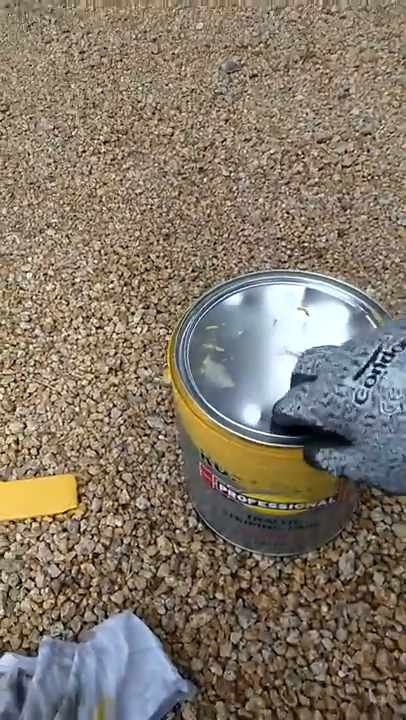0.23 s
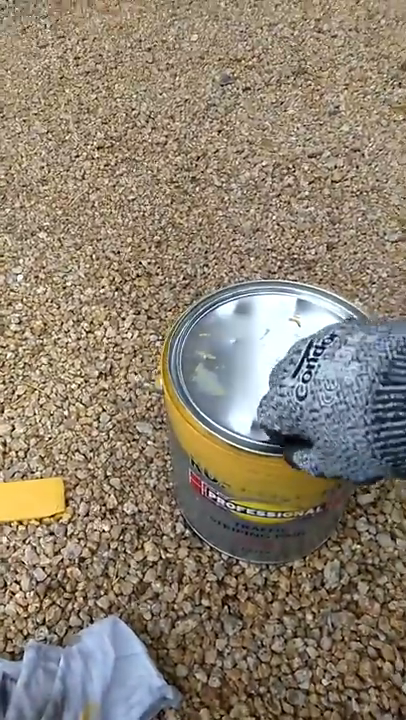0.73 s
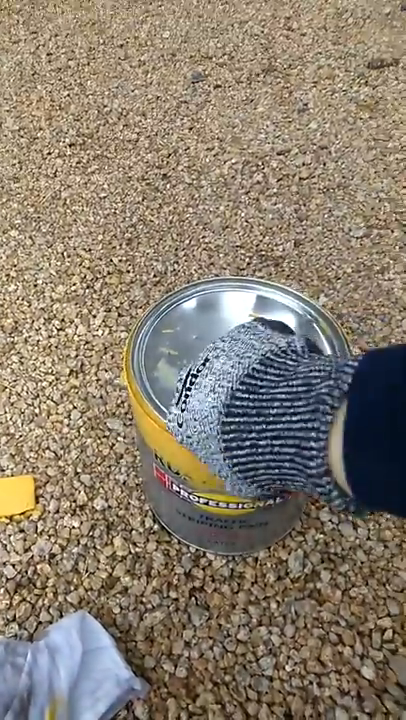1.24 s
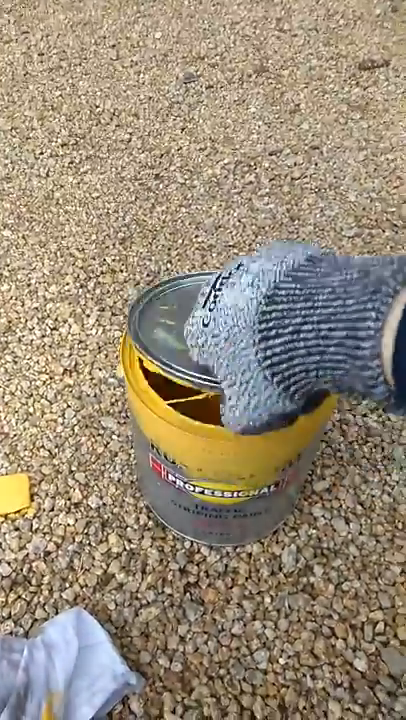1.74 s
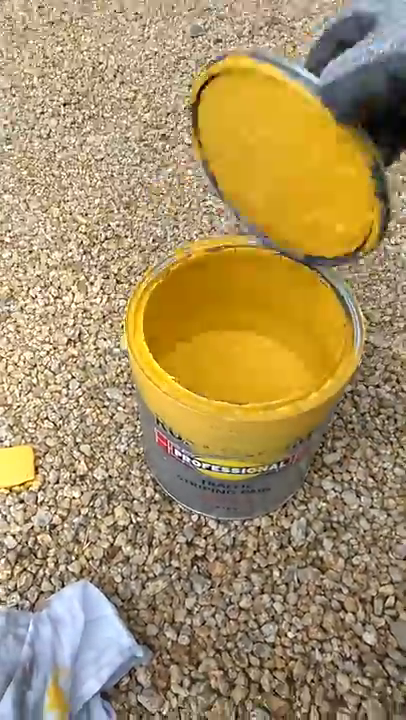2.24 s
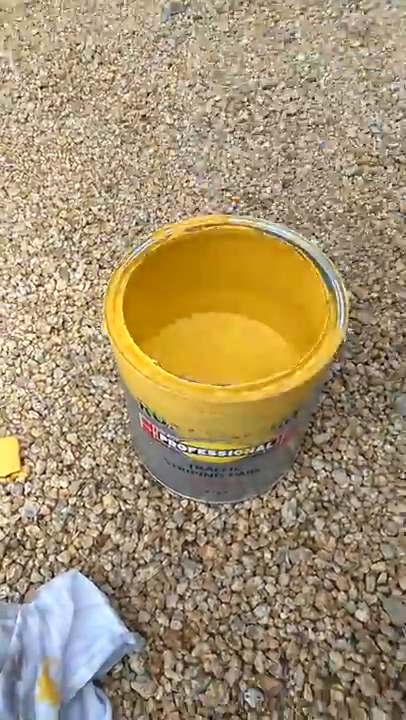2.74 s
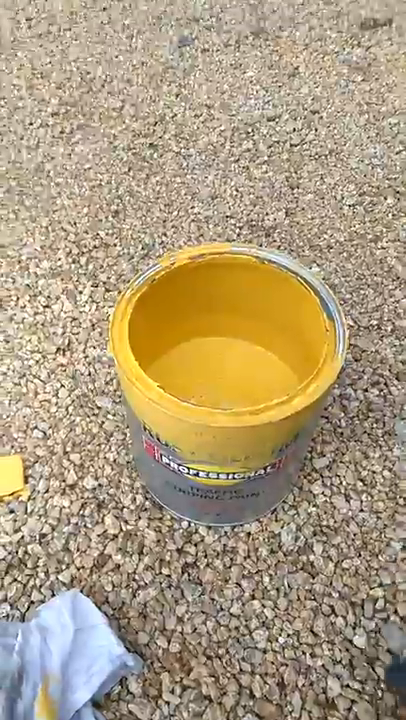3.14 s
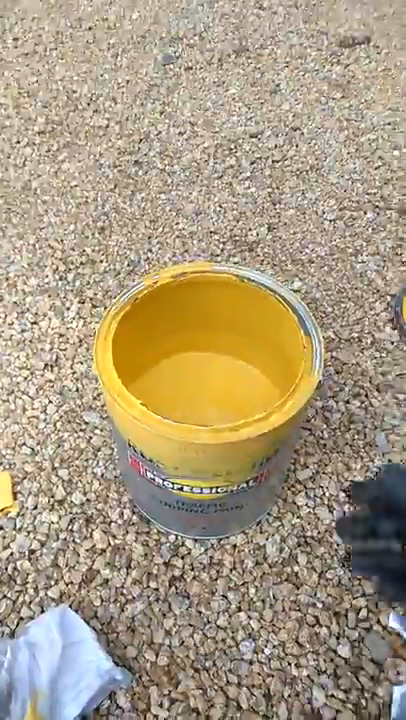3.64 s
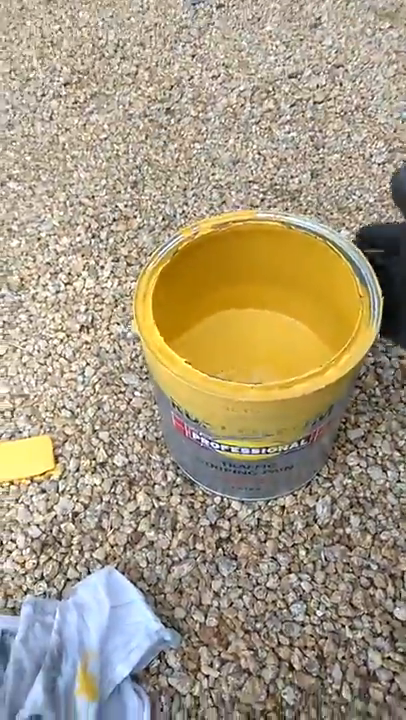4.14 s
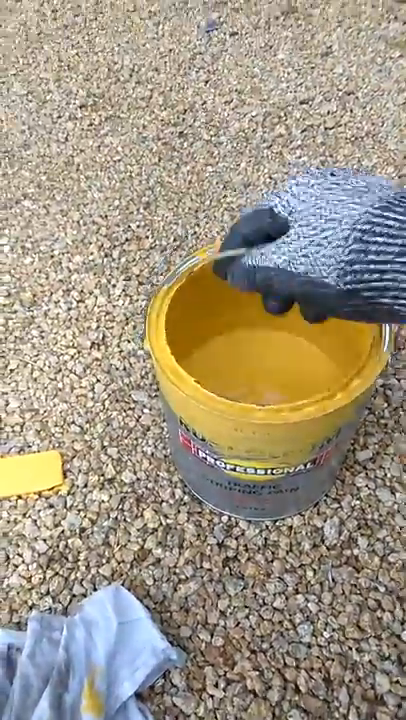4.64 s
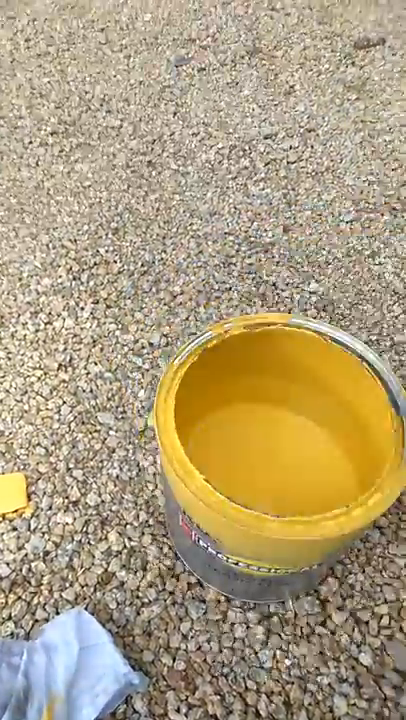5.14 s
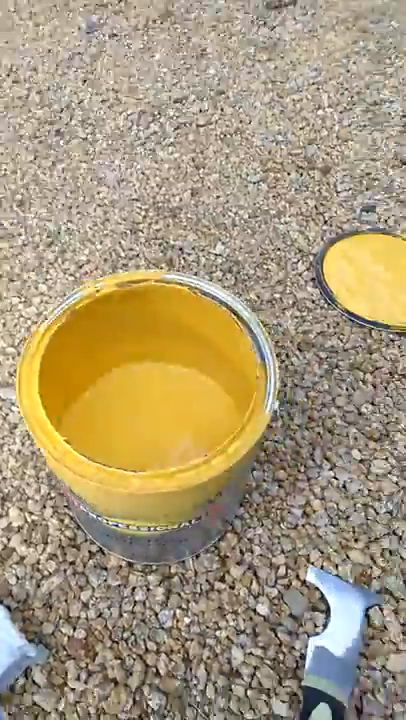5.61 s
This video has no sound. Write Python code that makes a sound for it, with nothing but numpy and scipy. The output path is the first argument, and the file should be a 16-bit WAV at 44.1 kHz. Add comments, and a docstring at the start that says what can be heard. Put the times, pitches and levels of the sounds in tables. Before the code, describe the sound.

Outdoors, thin metal ticks and pops, a loud lid clatter on gravel, sharp handle clicks, a can thud and a gritty final scrape.

```python
"""A gloved hand works the loose lid off a paint can standing on gravel and drops the lid beside it.
The wire handle clicks in its lugs as the can is tilted; the can is set back and the handle falls on the rim.
Contacts are noise bursts with ringing modes and a shimmer of partials; thumps, pops and pebbles are damped sines.
A jacket sleeve (shaped noise) swishes close to the left microphone, over low outdoor noise and a drone.
A gritty scrape (shaped noise) of a glove on a tool's handle ends it. The loudest blows overload the input."""
import sys
import numpy as np
from scipy import signal
from scipy.fft import rfft, irfft, next_fast_len
from scipy.io import wavfile
from scipy.ndimage import uniform_filter1d

SR = 44100
rng = np.random.default_rng(int(sys.argv[2]) if len(sys.argv) > 2 else 0)


def put_to_file(sound):
    """Save the sound as 16-bit audio at rate SR, in the file named by the first command-line argument."""
    columns = np.atleast_2d(sound).T  # one column per channel
    safe = np.clip(columns, -1, 1)
    whole_steps = np.round(safe * 32767)
    wavfile.write(sys.argv[1], SR, whole_steps.astype(np.int16))


N = 258951
TIME = np.arange(N) / SR
SLOW_TIME = np.linspace(0, N / SR, 1200)

# All levels are relative: mixing gains and channel balances follow.
# Outdoor spectra. Each row: frequency in Hz, gain in dB.
RUMBLE_SPECTRUM = [(20, -31), (40, 12), (60, 31), (100, 27), (160, 7), (300, -49)]
ROAR_SPECTRUM = [(80, -4.5), (170, 0.5), (280, -0.5), (450, -5), (700, -6), (1100, -16), (2000, -39)]
HOLLOW_SPECTRUM = [(120, -32), (215, -16.5), (275, 11), (325, -15), (600, -52)]
BUFFET_SPECTRUM = [(30, -17), (55, 6.5), (110, -1.5), (170, 7), (230, 1.5), (340, 0), (600, -36)]
# Low buffets of moving air. Each row: top in seconds, rise in seconds, fall in seconds, level in dB.
BUFFETS = [(.25, .13, 0.23, -45.5), (1.1, 0.17, 0.1, -43), (1.58, 0.099, .1, -38),
           (2.45, 0.48, 0.51, -41.5), (3.45, 0.12, 0.74, -47)]
RUMBLE_DB, RUMBLE_GUST_DB, ROAR_DB, ROAR_GUST_DB, GUST_S = -44.5, 4, -50, 3, 0.33
# Single swells over a steady level: top s, rise s, fall s, dB
DRONE_SWELL, DRONE_DB, DRONE_FLUTTER_DB = (0.52, 0.45, 0.45, -32), -46, 3
HOLLOW_SWELL, HOLLOW_DB = (2.5, 0.44, 0.55, -40), -56
DRONE_CENTRE_HZ = 86.5
SWELL_EDGE_DB, SWELL_SHAPE = -7.5, 2.13  # level one rise or fall time from the top; 1 = pointed, 2 = bell

# Strokes of the arm. Each row: top speed in seconds, rise in seconds, fall in seconds, swish in dB,
# rub of the cloth body in dB against the swish.
ARM_STROKES = [(.2, 0.05, 0.14, -52, -12.5), (.48, 0.13, 0.1, -46, -12.5), (.86, 0.083, 0.13, -58, -24),
               (.98, 0.066, 0.11, -54.5, -9.5), (1.29, .15, 0.16, -42, -15.5),
               (1.61, 0.23, 0.086, -52, -12.5), (2.03, 0.12, 0.23, -53, -11.5),
               (2.55, 0.36, 0.2, -48.5, -12), (2.95, 0.098, 0.28, -44.5, -16.5),
               (3.26, 0.38, 0.24, -45.5, -11.5), (3.87, 0.18, 0.14, -48, -9.5),
               (4.25, 0.19, 0.45, -53.5, -6), (4.7, 0.22, 0.19, -49.5, -10),
               (5.35, 0.18, 0.28, -43.5, -12.5), (5.87, 0.2, .1, -45, -19)]
# Sleeve spectra. Each row: frequency in Hz, gain in dB.
SWISH_SPECTRUM = [(4800, -65), (5600, -17), (6600, -6), (8500, -3.5), (10500, -5), (12300, 1.5),
                  (13800, -3.5), (15500, -16)]
RUB_SPECTRUM = [(500, 7), (1200, 5.5), (2200, 7.5), (2900, 5.5), (4100, 7.5), (5300, 3.5), (8000, -45),
                (15000, -33)]
FLAP_SPECTRUM = [(100, -15), (250, -3.5), (450, -17), (700, -2), (1100, -10), (2000, -31)]
REST_SWISH_DB, REST_RUB_DB = -65.5, -80.5  # the sleeve never lies quite still
FLAP_DB, FLAP_DB_PER_RUB_DB = -56.5, 0.57  # FLAP_DB applies at the strongest rub

# The right microphone faces away. Each row: frequency in Hz, right-channel filter gain in dB.
RIGHT_SHADE = [(100, -5.5), (1000, -2.5), (4500, -2), (7000, -11.5), (9000, -21), (12000, -13.5),
               (15000, -15)]
RIGHT_SLEEVE_SHADE = [(1000, -4), (4400, -2), (8000, -21.5), (14000, -28)]

# A glove slides on a tool's handle: a gritty scrape. Each row: time in seconds, level in dB.
SCRAPE_LEVEL = [(5.7, -63), (5.77, -39.5), (5.82, -36.5), (5.87, -32)]
# Each row: frequency in Hz, gain in dB.
SCRAPE_SPECTRUM = [(600, -8.5), (1500, -12.5), (1950, -2), (2700, -16), (4300, -17.5), (5400, -17),
                   (6500, -10), (7100, 10), (8200, -17), (15000, -35)]
# Pebbles chink under the lid and the can. Each row: start in seconds, level in dB, frequency in Hz, T60 in seconds.
PEBBLE_CHINKS = [(3.0205, -11, 13000, .025), (3.0435, -19, 9300, 0.026), (3.0745, -20, 13300, .025),
                 (3.097, -25, 8250, 0.039), (5.1275, -33, 4800, 0.024)]
# Can and lid thump on the gravel. Each row: start in seconds, level in dB.
GRAVEL_THUMPS = [(0.91, -31.5), (2.94, -23), (2.991, -26), (5.072, -18.5), (5.087, -9.5), (5.192, -22.5)]
# Each row: frequency in Hz, level in dB against the thump, T60 in seconds.
THUMP_MODES = [(200, -7, 0.046), (248, 0, 0.038), (371, -4.5, 0.061), (442, -11.5, 0.12), (783, -12, 0.048)]
# The flexed lid panel pops. Each row: start in seconds, level in dB, frequency in Hz, T60 in seconds.
LID_POPS = [(.049, -22, 1010, 0.014), (.0508, -17, 1594, 0.016), (2.232, -44, 967, 0.09),
            (2.305, -41, 922, 0.11)]

# Metal contacts. Each row: start in seconds, level in dB, chatter time in seconds, T60 of the force in seconds,
# body weight (below about 5800 Hz) in dB, ring in dB against the level.
HANDLE_CLICKS = [(4.084, -34, 0.027, 0.11, -16, -24), (4.1465, -5.5, 0.0058, 0.011, -7, -16),
                 (4.162, -36, 0.03, 0.14, 6, -8), (4.1875, -25, .001, 0.025, -25, -12),
                 (4.219, -40, 0.0028, 0.085, 42, 21.5), (4.2615, -9, 0.0051, 0.023, -3, -1.5),
                 (4.362, -25, 0.0023, 0.058, 2.5, -5), (4.413, -28, 0.0035, 0.02, 8.5, 1.5),
                 (4.473, -24, 0.023, 0.058, 7.5, 1.5), (4.531, -23, 0.0055, 0.072, 5, -2),
                 (4.615, -37.5, 0.024, 0.095, -2, 6), (4.7265, -27.5, 0.00086, 0.073, 3, -3),
                 (4.757, -32, 0.018, 0.07, -9, -4), (4.8038, -.5, 0.003, 0.015, -2.5, -1.5)]
HANDLE_FALLS = [(5.261, 1, 0.0053, 0.15, 0, -6.5), (5.312, -18, 0.024, 0.11, 0.35, -10),
                (5.391, -12.5, 0.0098, 0.05, 1, -5)]
CAN_LANDINGS = [(5.058, -16.5, 0.015, .05, -10.5, -10), (5.071, -9, 0.0094, 0.048, -7, -6.5),
                (5.089, -6, 0.011, 0.04, -5.5, -4.5), (5.114, -20.5, 0.0087, 0.17, 2, -2),
                (5.169, -19, 0.0088, 0.099, 1.5, -5), (5.191, -18.5, 0.0029, 0.065, 8.5, -24),
                (5.236, -24, .001, 0.022, -18, -6)]
LID_PRYING = [(.0005, -16.5, 0.0028, 0.0093, -4, -4.5), (.0415, -15.5, .0008, 0.012, -14, -21),
              (.0515, -20.5, 0.0023, 0.029, 5, -13), (.068, -31, 0.01, 0.25, 0, -19),
              (.0925, -35, .001, 0.044, 11, -3), (.2025, -28, 0.0012, .015, -17, -30),
              (.3915, -28.5, .002, 0.037, -3, -39), (.909, -32.5, 0.0039, 0.071, 3.5, -7.5),
              (1.943, -34, 0.046, 0.04, -13, -35), (2.1965, -33, 0.0013, 0.012, 6, -41),
              (2.2285, -28.5, 0.0012, 0.018, 5, -16), (2.372, -29, 0.0022, 0.03, 3, -36)]
LID_HITS = [(2.9375, 3, 0.01, 0.017, 2.5, -19), (2.952, -21.5, .004, 0.071, 5, 5),
            (2.9815, 0.5, 0.008, 0.032, 3, -7), (2.997, 0, 0.004, 0.045, 3, -6.5),
            (3.0195, -17, 0.0023, 0.01, 12.5, -12), (3.043, -18, 0.0016, 0.032, 10.5, -19),
            (3.05, -14, 0.0021, 0.033, 0, -8), (3.074, -19, 0.0015, 0.02, 9, -17),
            (3.097, -26.5, 0.0017, 0.054, 17.5, -12), (3.15, -33.5, 0.012, 0.056, 12, -5)]
# Contact spectra. Each row: frequency in Hz, gain in dB (each response is scaled to energy 1).
CLICK_SPECTRUM = [(100, -36), (800, -27.5), (1400, -13.5), (2500, -22.5), (4500, -9.5), (6000, -12.5),
                  (7400, -5.5), (8400, 4), (9800, -9), (12000, -9.5), (15500, -18)]
FALL_SPECTRUM = [(80, -36), (400, -17.5), (850, -17.5), (1400, -14.5), (2700, -14), (4600, -6), (5600, -10),
                 (7000, 0), (9000, 4), (11000, -2), (13500, -4), (15500, -5.5)]
CAN_SPECTRUM = [(50, -11), (120, -4.5), (400, -4), (650, -26), (1400, -16), (2500, -16), (4500, -11.5),
                (6000, -8), (7000, -4.5), (9000, -3), (13000, -10), (15500, -16)]
PRYING_SPECTRUM = [(100, -32), (700, 0), (1600, -10), (2700, -8.5), (3400, -2), (4300, -6.5), (6000, -4.5),
                   (7700, 6), (9000, 2.5), (11000, 4), (14000, 1.5), (15500, -13)]
LID_SPECTRUM = [(60, -14), (220, -14), (500, -15), (1000, -15), (2200, -20), (4000, -19), (5600, -14),
                (6600, -7), (9000, -7), (11800, 1.5), (13600, 1), (15500, -17)]
# Metal modes. Each row: centre frequency in Hz, peak in dB against the contact's ring, T60 in seconds.
LUG_MODES = [(1316, -18.5, 0.063), (2050, -49, 0.2), (4730, -28, 0.11), (6100, -42, 0.051),
             (7300, -46, .04), (7800, -37, 0.043), (9800, -27, 0.13)]
WIRE_MODES = [(1328, -19.5, 0.054), (2030, -54, 0.12), (4660, -12, 0.12), (6600, -27, 0.29),
              (7160, -16.5, 0.21), (8350, -21.5, 0.4), (8700, -20, 0.25), (10500, -23, 0.52),
              (10610, -37, 0.15), (11200, -36, 0.17), (12900, -16, 0.39), (15800, -35, 0.21)]
CAN_MODES = [(1065, -28, 0.049), (1318, -15, 0.087), (3460, -40, 0.21), (3870, -28, 0.1),
             (4840, -18, 0.071), (5400, -37, 0.15), (4700, -25, 0.13), (5900, -33, .16)]
PRYING_MODES = [(1640, -29, 0.12), (2590, -16, 0.058), (3300, -22, 0.1), (3510, -38, 0.053),
                (7200, -30, 0.15), (7900, -1, 0.033), (11500, -21, .28)]
LID_MODES = [(932, -23, 0.26), (1017, -24, 0.29), (1537, -23, 0.14), (2800, -31, 0.14), (4050, -28, 0.27),
             (4820, -17, 0.061), (6554, -4.5, 0.026), (8430, -75.5, 0.17), (9600, -27, 0.36),
             (11620, -5, 0.029), (11800, -26, 0.14), (12620, -79, .12), (12400, -15, 0.15)]


def amp(db):
    """Decibels to gain."""
    return np.exp(np.asarray(db) * np.log(10) / 20)


def unit(x):
    """Scales to rms 1."""
    return x / np.sqrt(np.mean(x ** 2) + 1e-20)


def follow(table):
    """Joins level points in dB into a gain for every sample."""
    time_s, level_db = np.transpose(table)
    return amp(np.interp(TIME, time_s, level_db))


def read(points, hz):
    """A spectrum in dB, joined on a log-frequency axis."""
    point_hz, db = np.transpose(points)
    return np.interp(np.log(hz + 1), np.log(point_hz + 1), db)


def colour(x, points):
    """Filters by a smooth spectrum, with zero phase."""
    size = next_fast_len(x.shape[-1], True)
    gain = amp(read(points, np.fft.rfftfreq(size, 1 / SR)))
    return irfft(rfft(x, size) * gain, size)[..., :x.shape[-1]]


def causal(db):
    """Minimum-phase impulse response with this spectrum shape: sharp start, energy 1."""
    cepstrum = irfft(db * np.log(10) / 20)
    half = len(cepstrum) // 2
    cepstrum[1:half] *= 2
    cepstrum[half + 1:] = 0
    response = irfft(np.exp(rfft(cepstrum)))[:half]
    return response / np.linalg.norm(response)


def add(mix, start_s, sound):
    """Mixes a sound in at its start time."""
    part = mix[:, max(round(start_s * SR), 0):][:, :sound.shape[1]]
    part += sound[:, :part.shape[1]]


def pair(correlation, size=N):
    """Two channels of noise with the given correlation."""
    a, b = rng.standard_normal((2, size))
    c = np.clip(correlation, -1, 1)
    return np.array([a, c * a + np.sqrt(1 - c * c) * b])


def grain(depth_db, size, width):
    """A fast random gain of smoothed noise, scaled to rms 1."""
    uneven = unit(uniform_filter1d(rng.standard_normal(size), width))
    return unit(amp(depth_db * uneven))


def swell(top_s, rise_s, fall_s, db):
    """A gain that grows to one rounded top and dies away."""
    away = np.maximum((top_s - SLOW_TIME) / rise_s, (SLOW_TIME - top_s) / fall_s)
    level_db = db + SWELL_EDGE_DB * np.minimum(away, 10) ** SWELL_SHAPE
    return np.interp(TIME, SLOW_TIME, amp(level_db))


def gusts(depth_db):
    """A gain that wanders slowly by chance."""
    size = max(round(GUST_S * SR), 1)
    slow = uniform_filter1d(rng.standard_normal(N), size, mode="wrap")
    slow = uniform_filter1d(slow, size // 2 + 1, mode="wrap")
    return amp(depth_db * np.clip(unit(slow), -2, 2))


def pings(table, left_db, right_db, size=12000):
    """Each row is one damped sine with a soft onset of about one period."""
    out, t = np.zeros((2, N)), TIME[:size]
    balance_db = np.array([[left_db], [right_db]])
    for start_s, level_db, hz, t60_s in table:
        envelope = (1 - np.exp(-t * hz)) * amp(-60 * t / t60_s)
        add(out, start_s, amp(level_db + balance_db) * envelope * np.sin(2 * np.pi * hz * t))
    return out


def partials(t60_s, count=220, size=5500):
    """Thin metal: many close partials with scattered decays; strength and phase differ at each microphone."""
    place, life, *draws = rng.random((6, count, 1))
    phase, strength = np.reshape(draws, (2, 2, count, 1))
    t = TIME[:size]
    hz = 1500 + 14000 * (np.arange(count)[:, None] + place) / count
    dying = np.exp(-np.log(1000) * t / (t60_s * (.5 + life)))
    response = (strength * dying * np.sin(2 * np.pi * (hz * t + phase))).sum(1)
    return response / np.linalg.norm(response[0])


def ring(force, modes, waver_hz=22):
    """Each mode stores contact energy and lets it die away; the shifting contact bends its pitch."""
    t, out = TIME[:len(force)], 0
    knots_s = np.linspace(0, t[-1], 30)
    for hz, db, t60_s in modes:
        energy = signal.lfilter([1], [1, -amp(-120 / (t60_s * SR))], force ** 2)
        stored = np.sqrt(energy)
        bend_hz = waver_hz * np.sqrt(hz / 1000) * np.interp(t, knots_s, rng.standard_normal(30))
        cycles = np.cumsum(hz + bend_hz) / SR + rng.random()
        out = out + amp(db) * stored / stored.max() * np.sin(2 * np.pi * cycles)
    return np.sqrt(2) * out


def strike(hits, spectrum, modes, lag_ms, grain_db, shimmer_db, shimmer_t60_s,
           attack_s=0.00023, spot_db=2.0, size=11000):
    """Metal chatters on what it touches: a burst of tiny uneven impacts, ringing modes, a shimmer of partials."""
    clacks, rings = np.zeros((2, 2, N))
    t, hz = TIME[:size], np.fft.rfftfreq(2048, 1 / SR)
    below_treble = 1 / (1 + (hz / 5800) ** 8)
    for start_s, level_db, held_s, t60_s, weight_db, ring_db in hits:
        force = (1 - np.exp(-t / attack_s)) * amp(-60 * np.maximum(t - held_s, 0) / t60_s)
        uneven = np.clip(unit(uniform_filter1d(rng.standard_normal(size), size=40)), -2, 2)
        impacts = force * unit(amp(grain_db * uneven)) * pair(0.65, size)
        impacts *= np.linalg.norm(force) / np.linalg.norm(impacts[0])  # the force sets the burst energy
        # each contact lands on another spot, which favours other frequencies
        spot = spot_db * unit(uniform_filter1d(rng.standard_normal(len(hz)), size=14))
        response = causal(read(spectrum, hz) + weight_db * below_treble + spot)
        burst = signal.oaconvolve(impacts, response[None], axes=1)[:, :size]
        add(clacks, start_s, amp(level_db) * burst)
        add(rings, start_s, amp(level_db + ring_db) * ring(force, modes)[None])
    shimmer = signal.oaconvolve(clacks, partials(shimmer_t60_s), axes=1)[:, :N]
    left, right = amp(-2.0) * clacks + rings + amp(shimmer_db) * shimmer
    # positive lag: the left microphone hears it later than the right
    return np.array([left, np.interp(TIME + lag_ms / 1000, TIME, colour(right, RIGHT_SHADE))])


def tail(x, t60_s, size=26000):
    """Faint echo from the yard: decaying noise as impulse response, independent at each microphone."""
    response = rng.standard_normal((2, size)) * amp(-60 * TIME[:size] / t60_s)
    return signal.oaconvolve(x, response / np.linalg.norm(response[0]), axes=1)[:, :N]


def rumble():
    """Low gusty noise, nearly alike at both microphones."""
    noise = amp(RUMBLE_DB) * gusts(RUMBLE_GUST_DB) * unit(colour(pair(0.91), RUMBLE_SPECTRUM))
    return noise * amp([[.2], [-.2]])


def roar():
    """Gusty noise, one swell in a hollow band, and soft low buffets of moving air."""
    noise = amp(ROAR_DB) * gusts(ROAR_GUST_DB) * unit(colour(pair(0.55), ROAR_SPECTRUM))
    hollow_gain = np.hypot(amp(HOLLOW_DB), swell(*HOLLOW_SWELL))
    noise += hollow_gain * unit(colour(pair(0.88), HOLLOW_SPECTRUM))
    buffet_gain = sum(swell(*row) for row in BUFFETS)
    noise += buffet_gain * unit(colour(pair(0.87), BUFFET_SPECTRUM))
    return noise * amp([[1.8], [-1.8]])


def drone():
    """A far sine whose pitch wavers by 3 Hz rms; it swells once and its level flutters."""
    waver = unit(colour(rng.standard_normal(N), [(0, -3), (5, -4.5), (30, -26), (200, -120)]))
    gain = np.hypot(amp(DRONE_DB), swell(*DRONE_SWELL)) * gusts(DRONE_FLUTTER_DB)
    tone = np.sin(2 * np.pi * np.cumsum(DRONE_CENTRE_HZ + 3 * waver) / SR)
    return gain * tone * np.array([[1.2], [.8]])


def sleeve():
    """Jacket cloth slides on itself with each arm stroke: a bright grainy swish, a duller rub, a low flap."""
    strokes = [(swell(top_s, rise_s, fall_s, db), rub_db) for top_s, rise_s, fall_s, db, rub_db in ARM_STROKES]
    sliding = np.sqrt(amp(REST_SWISH_DB) ** 2 + sum(gain ** 2 for gain, _ in strokes))
    pressing = np.sqrt(amp(REST_RUB_DB) ** 2 + sum((gain * amp(rub_db)) ** 2 for gain, rub_db in strokes))
    swish = amp(8) * sliding * unit(colour(pair(0), SWISH_SPECTRUM))
    rub = amp(8.0) * pressing * unit(colour(pair(0.05), RUB_SPECTRUM))
    flap_gain = amp(FLAP_DB) * (pressing / pressing.max()) ** FLAP_DB_PER_RUB_DB
    flap = flap_gain * unit(colour(pair(0.27), FLAP_SPECTRUM))
    left, right = grain(0.5, N, width=120) * (swish + rub + flap)
    return np.array([left, colour(right, RIGHT_SLEEVE_SHADE)])


def scrape():
    """A glove slides on a tool's handle: gritty noise that swells in two broad resonances."""
    grit = grain(1.4, N, width=90)
    left, right = follow(SCRAPE_LEVEL) * grit * unit(colour(pair(0.24), SCRAPE_SPECTRUM))
    return np.array([left, colour(right, RIGHT_SHADE)])


def pebbles():
    """Small stones chink: short, high damped sines."""
    return pings(PEBBLE_CHINKS, left_db=6.5, right_db=-18)


def thumps():
    """Every thump on the gravel swings the same low modes."""
    swings = [(start_s, level_db + db, hz, t60_s)
              for start_s, level_db in GRAVEL_THUMPS for hz, db, t60_s in THUMP_MODES]
    return pings(swings, left_db=7, right_db=0.0)


def handle_clicks():
    """The wire handle clicks in its lugs and rings them."""
    return strike(HANDLE_CLICKS, CLICK_SPECTRUM, LUG_MODES, lag_ms=0.22, grain_db=6.5,
                  shimmer_db=-4.5, shimmer_t60_s=0.036, attack_s=0.0004)


def handle_falls():
    """The handle falls on the rim and its wire modes ring."""
    return strike(HANDLE_FALLS, FALL_SPECTRUM, WIRE_MODES, lag_ms=0.18, grain_db=2.0,
                  shimmer_db=-4.0, shimmer_t60_s=0.051, attack_s=0.00066)


def can_landings():
    """The can is set back on the gravel; its body rings briefly."""
    return strike(CAN_LANDINGS, CAN_SPECTRUM, CAN_MODES, lag_ms=0.15, grain_db=4.5,
                  shimmer_db=-5.5, shimmer_t60_s=0.041, attack_s=0.00083)


def lid_pops():
    """The lid panel pops as it is flexed and lifted: damped sines."""
    return pings(LID_POPS, left_db=5, right_db=-7.5)


def lid_prying():
    """The loose lid chatters and rings as it is worked off."""
    return strike(LID_PRYING, PRYING_SPECTRUM, PRYING_MODES, lag_ms=-0.25, grain_db=6.5,
                  shimmer_db=-8.5, shimmer_t60_s=0.061)


def lid_hits():
    """The dropped lid strikes the gravel, chatters and rings."""
    return strike(LID_HITS, LID_SPECTRUM, LID_MODES, lag_ms=.17, grain_db=5.5,
                  shimmer_db=-4.5, shimmer_t60_s=0.079, attack_s=0.001)


def can_and_lid():
    """All contacts of can, handle and lid, sharing one faint echo."""
    near = pebbles() + thumps() + handle_clicks() + handle_falls() + can_landings()
    near += lid_pops() + lid_prying() + lid_hits()
    return near + amp(-22.0) * tail(near, t60_s=0.36)


def scene():
    """Everything, as it arrives at the two microphones."""
    outdoors = rumble() + roar() + drone()
    return outdoors + sleeve() + scrape() + can_and_lid()


def record(dry):
    """The microphones have opposite polarity; the input overloads with a firm knee, then is band-limited."""
    wired = dry * np.array([[1], [-1]])
    clipped = wired / (1 + (abs(wired) / .87) ** 6) ** (1 / 6)
    lowpass = signal.firwin(601, 15750, window=("kaiser", 8), fs=SR)  # cutoff in Hz
    return signal.oaconvolve(clipped, lowpass[None], "same")


dry = scene()
out = record(dry)
put_to_file(out)
```